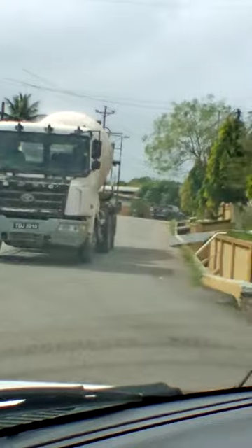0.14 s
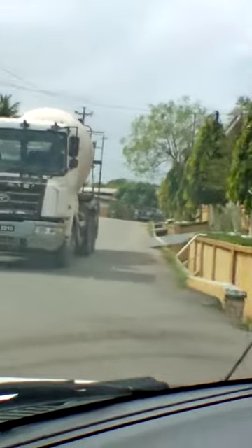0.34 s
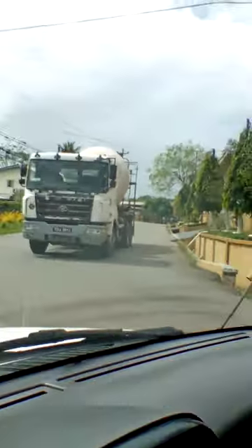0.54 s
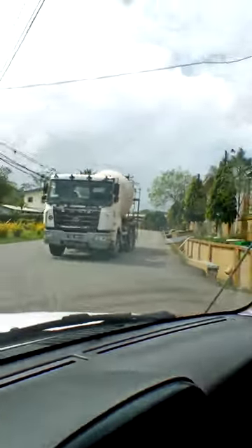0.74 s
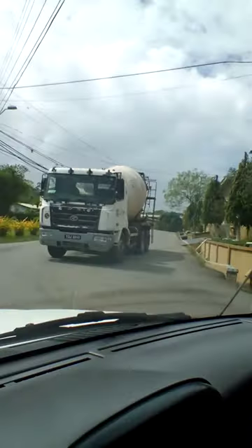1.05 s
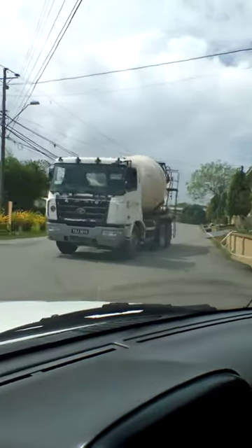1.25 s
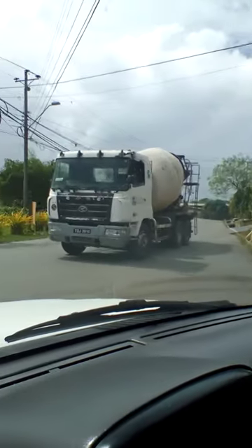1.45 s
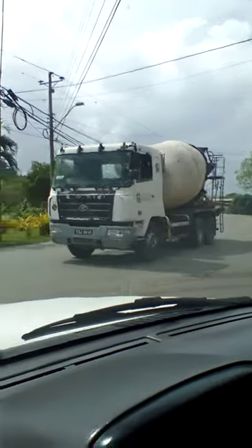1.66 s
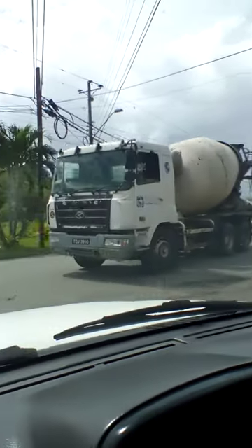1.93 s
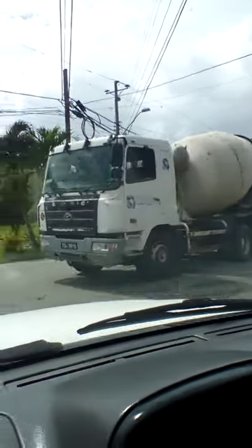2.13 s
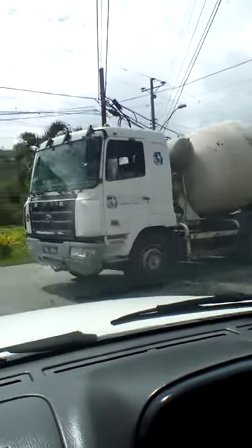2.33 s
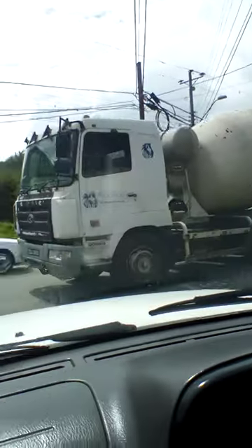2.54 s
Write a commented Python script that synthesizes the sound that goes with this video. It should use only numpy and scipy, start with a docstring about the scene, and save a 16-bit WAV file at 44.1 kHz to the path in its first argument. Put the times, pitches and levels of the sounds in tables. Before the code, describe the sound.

A diesel cement mixer truck approaches and passes close by, droning and clattering, heard through glass from the front seat of a moving car. The car's engine booms briefly, then eases, while road rumble continues and the turn signal ticks faintly.

```python
"""Road rumble fades in first, heard from the front seat of a moving car. The engine's firing pulses boom
in the cabin, then sink as the throttle eases. An oncoming diesel cement mixer passes close by, behind
glass: its exhaust drones, its uneven cylinders clatter and its tyres howl as it draws level.
Near the microphone the trim rustles and rattles, and the contact of the turn-signal relay
ticks shut and tocks open in the dashboard."""
import sys
import numpy as np
from scipy import signal
from scipy.fft import rfft, irfft
from scipy.io import wavfile
from scipy.ndimage import uniform_filter1d

SR = 44100
rng = np.random.default_rng(int(sys.argv[2]) if len(sys.argv) > 2 else 0)


def log_audio(samples):
    """Write samples as a 16-bit WAV file to the path given in sys.argv[1]."""
    # one column per channel
    frames = np.atleast_2d(samples).T
    # limit to full scale, then quantise
    limited = np.clip(frames, -1, 1)
    pcm = np.round(limited * 32767).astype(np.int16)
    wavfile.write(sys.argv[1], SR, pcm)


N = 118629

# road rumble in the cabin (frequency [Hz], relative level [dB])
RUMBLE_SPECTRUM = [(20, -26.5), (32, -16), (52, -15.5), (62, -2.5), (74, 6.5), (108, 7.5), (125, 1),
                   (145, 4.5), (168, -6), (220, -35.5), (1800, -100)]
# road rumble (time [s], level [dB])
RUMBLE_LEVEL = [(0, -29.5), (.4, -33.5), (.8, -32.5), (.95, -33), (1.17, -28), (1.6, -35), (1.69, -34),
                (1.82, -30.5), (1.96, -36.5), (2.02, -30.5), (2.12, -32.5), (2.36, -29), (2.49, -33),
                (2.55, -31), (2.69, -31)]
# tyre and panel drone (frequency [Hz], relative level [dB])
DRONE_SPECTRUM = [(100, -70.5), (160, -23.5), (185, -7.5), (215, 0.5), (250, 0), (295, -1.5), (345, -3.5),
                  (385, -4.5), (420, -13.5), (520, -17.5), (700, -33), (3000, -100)]
# tyre and panel drone (time [s], level [dB])
DRONE_LEVEL = [(0, -43.5), (.4, -30.5), (.62, -36), (.95, -32), (1.15, -35), (1.4, -34), (1.72, -34),
               (1.92, -34.5), (2.35, -35), (2.69, -38)]
# tyre roar through the glass (frequency [Hz], relative level [dB])
ROAR_SPECTRUM = [(250, -13), (450, 3.5), (620, -1.5), (800, -6), (960, -1), (1100, -6.5), (1300, -12),
                 (2500, -18.5), (5000, -45.5), (9000, -75.5)]
# tyre roar (time [s], level [dB])
ROAR_LEVEL = [(0, -54.5), (.4, -46), (.75, -45.5), (1.1, -46), (1.45, -46), (1.8, -45.5), (2.05, -51.5),
              (2.35, -46.5), (2.69, -45)]
# howl of the truck's tyres (centre [Hz], width [Hz], relative level [dB])
HOWL_MODES = [(463, 90, -1.5), (622, 44, -6.5), (750, 100, -5)]
# tyre howl (time [s], level [dB])
HOWL_LEVEL = [(0, -70), (1.6, -58), (2.05, -46.5), (2.22, -47), (2.35, -52.5), (2.69, -45.5)]

# rustle and buzz of the cabin trim (frequency [Hz], relative level [dB])
TRIM_SPECTRUM = [(1000, -7.5), (2500, 8), (3400, 3), (4000, 2.5), (4600, 0), (5600, -0.5), (6700, -8.5),
                 (7400, -17.5), (8200, -25.5), (11000, -23.5), (13000, -46.5)]
# trim rustle (time [s], level [dB])
TRIM_LEVEL = [(0, -72.5), (.35, -64.5), (.7, -66.5), (.85, -65.5), (.98, -56), (1.2, -62.5), (1.4, -59),
              (1.58, -62.5), (1.74, -61), (1.87, -67), (1.97, -61), (2.07, -58), (2.25, -58.5),
              (2.4, -61.5), (2.69, -59.5)]
# first row: a short bright burst as the sound fades in; other rows: short rattles of the trim
# (time [s], level [dB], decay [s], centre [Hz], width [Hz])
BURSTS = [(0.217, -43.5, 0.0064, 2410, 4000), (.585, -47.5, 0.011, 3860, 3000),
          (1.274, -53.5, 0.025, 5770, 1620), (1.293, -51.5, 0.01, 5400, 1900),
          (1.356, -52, .01, 4900, 2530), (1.577, -60, 0.0038, 6735, 1790), (2.225, -55, 0.016, 4484, 398.3)]

# relay closing (time [s], level [dB])
TICKS = [(.4145, -50.5), (1.1215, -50.5), (1.8265, -47), (2.533, -48.5)]
# relay opening (time [s], level [dB])
TOCKS = [(.7545, -46), (1.464, -45.5), (2.170, -45)]
# relay and dashboard resonances on closing (centre [Hz], width [Hz], relative level [dB])
TICK_MODES = [(2950, 260, 1.5), (3400, 240, 4.5), (3790, 130, 1.5), (4450, 370, 1), (4980, 360, -4.5),
              (5440, 260, -6.5), (7470, 170, -12.5), (8130, 180, -22), (10870, 620, -25.5)]
# the same on opening (centre [Hz], width [Hz], relative level [dB])
TOCK_MODES = [(1380, 700, 3), (2600, 200, 4.5), (3130, 380, 1.5), (3780, 170, -3), (4480, 210, 1.5),
              (5500, 240, -5), (5740, 200, -9), (6600, 280, -7), (7260, 170, -6), (10850, 370, -24)]
# snap of the contact (frequency [Hz], relative level [dB])
SNAP_SPECTRUM = [(1200, 0), (6500, -3), (8800, -16), (15000, -33)]

# car engine speed (time [s], firing rate [Hz])
CAR_FIRING_RATE = [(0, 44.07), (.3, 44.56), (.5, 46.3), (.68, 46.02), (.8, 42.8), (.95, 37.07),
                   (1.15, 34.99), (1.9, 34), (2.3, 35.3), (2.69, 36.3)]
# car engine load (time [s], gain [dB])
CAR_LOAD = [(0, -43), (.27, -38.5), (.38, -22.5), (.48, -28), (.55, -22), (.65, -22), (.72, -27),
            (.78, -24.5), (.92, -37.5), (1.9, -36), (2.35, -33.5), (2.69, -32)]
# car engine harmonics, from the firing rate up (level [dB])
CAR_HARMONICS = [-12, -4, -14, -20, -16, -23, -21.5]

# truck exhaust harmonics, from the firing rate up (level [dB])
EXHAUST_HARMONICS = [-38, -46, -49.5]
# exhaust drone (time [s], gain [dB])
EXHAUST_GAIN = [(0, -5.5), (.65, 2), (.85, 2.5), (1.15, 0), (1.4, 6), (1.6, 5.5), (1.78, -3.5), (2.2, -1.5),
                (2.38, -0.5), (2.69, -7)]
# knock of each truck cylinder (relative level [dB])
CYLINDER_KNOCKS = [-6.5, -11, -7.5, -7, -6.5, -4]
# diesel clatter through the glass (frequency [Hz], relative level [dB])
CLATTER_SPECTRUM = [(400, 4), (650, 7.5), (850, -8), (1150, -0.5), (1450, 2.5), (1900, 0.5), (2450, -11),
                    (3000, -11), (4000, -12.5), (5000, -13.5), (6500, -22), (8000, -45), (12000, -74.5)]
# diesel clatter (time [s], level [dB])
CLATTER_LEVEL = [(0, -61), (.42, -50.5), (.66, -54.5), (.95, -52), (1.3, -52), (1.58, -59.5), (1.68, -51),
                 (1.95, -48), (2.07, -50), (2.2, -49), (2.36, -53), (2.47, -49.5), (2.69, -51.5)]
# narrow rings of the cabin fittings (centre [Hz], width [Hz], relative level [dB])
FITTING_MODES = [(1355, 36, 6.5), (1472, 43, -4), (2477, 310, -5.5), (4530, 100, -6.5), (5344, 37, -15.5),
                 (6700, 56, -22), (7240, 110, -25)]

# faint high hiss, brightest around 15 kHz (frequency [Hz], relative level [dB])
HISS_SPECTRUM = [(3000, 0), (11000, 0), (13800, -1), (15000, 10), (16000, 10)]
# opening fade (time [s], gain [dB])
FADE_IN = [(0, -67.5), (.075, -70), (.092, -16), (.115, -9.5), (.18, -7), (.22, -3.5), (.33, -1.5)]


def undb(db):
    """Decibels to gain."""
    return 10 ** (np.asarray(db) / 20)


def times():
    """Time of each sample."""
    return np.arange(N) / SR


def frequencies():
    """Frequency of each spectrum bin."""
    return np.arange(N // 2 + 1) * SR / N


def curve(rows):
    """Rows of (time [s], value) joined by straight lines."""
    return np.interp(times(), *np.array(rows, float).T)


def unit(x):
    """Scale to rms 1."""
    return x / np.sqrt(np.mean(x ** 2))


def noise():
    """White noise."""
    return rng.standard_normal(N)


def wander(rate_hz):
    """Smooth random drift with a spread of 1."""
    return unit(irfft(rfft(noise()) / (1 + (frequencies() / rate_hz) ** 4), N))


def colour(x, spectrum):
    """Filter by (frequency [Hz], level [dB]) points, rolling off below the first; rms 1."""
    hz, db = np.array(spectrum, float).T
    bins = frequencies() + 1e-3
    gain = undb(np.interp(np.log(bins), np.log(hz), db))
    low_cut = np.minimum(bins / hz[0], 1) ** 2
    return unit(irfft(rfft(x) * gain * low_cut, N))


def resonate(x, modes):
    """Pass through (centre [Hz], width [Hz], level [dB]) resonances; rms 1."""
    bins = frequencies()
    gain = sum(undb(db) / (1 + ((bins - hz) / width * 2) ** 2) for hz, width, db in modes)
    return unit(irfft(rfft(x) * gain, N))


def steady(x, span_s=.12):
    """Even out slow swells; rms 1."""
    return x / np.sqrt(uniform_filter1d(x ** 2, int(span_s * SR)))


def patchy(x, depth_db, rate_hz=15):
    """Let each narrow band swell and fade at random; rms 1."""
    frames = dict(fs=SR, nperseg=1024, noverlap=768)
    _, when, bands = signal.stft(x, **frames)
    pole = np.exp(-2 * np.pi * rate_hz * when[1])
    sway = signal.filtfilt([1 - pole], [1, -pole], rng.standard_normal(bands.shape), padtype="even")
    sway = unit(uniform_filter1d(sway, 4, axis=0))  # neighbouring bands move together
    _, swayed = signal.istft(bands * undb(depth_db * sway), **frames)
    return unit(swayed[:N])


def firing_pulses(firings, harmonics, flutter_db=.5):
    """A rounded pulse at each firing, built from harmonics that flutter in level."""
    return sum(np.sqrt(2) * undb(db + flutter_db * wander(34)) * np.cos(2 * np.pi * order * firings)
               for order, db in enumerate(harmonics, 1))


def road(bump_db=.81, cavity_hz=252.2, cavity_db=-44):
    """All around the microphone, the road shakes the cabin and its panels; the air in the tyres rings."""
    rumble = steady(colour(noise(), RUMBLE_SPECTRUM)) * undb(curve(RUMBLE_LEVEL))
    drone = steady(colour(noise(), DRONE_SPECTRUM)) * undb(curve(DRONE_LEVEL))
    bumps = undb(bump_db * wander(6.7))
    cavity_ring = undb(cavity_db) * resonate(noise(), [(cavity_hz, 10, 0)])
    return (rumble + drone) * bumps + cavity_ring


def tyres():
    """Outside the glass, treads roar on the asphalt; a howl grows as the truck draws level."""
    roar = patchy(colour(noise(), ROAR_SPECTRUM), depth_db=2) * undb(curve(ROAR_LEVEL))
    howl = resonate(noise(), HOWL_MODES) * undb(curve(HOWL_LEVEL))
    return roar + howl


def trim(flicker_db=2.5, attack_s=.0035):
    """Near the microphone, the cabin trim rustles and rattles; a bright burst sounds in the fade-in."""
    rustle = undb(curve(TRIM_LEVEL) + flicker_db * wander(35)) * colour(noise(), TRIM_SPECTRUM)
    sound = patchy(rustle, depth_db=5.2) * np.std(rustle)
    for start, db, decay_s, hz, width in BURSTS:
        age = np.maximum(times() - start, 0)
        envelope = undb(db) * np.minimum(age / attack_s, 1) * np.exp(-age / decay_s)
        sound += envelope * resonate(colour(noise(), TRIM_SPECTRUM), [(hz, width, 0)])
    return sound


def relay(events, modes, attack_s, ring_hz, ring_db):
    """At arm's length, a contact snaps and chatters, rings its case and the dashboard, and dies away."""
    hold_s, decay_s = .012, .0089
    tail_db, tail_s = -26.5, .053  # lingering in the cabin
    snap_db, snap_delay_s, snap_s = -1, .005, .0011  # the contact lands
    envelope, snap = 0, 0
    for start, db in events:
        age = np.maximum(times() - start, 0)
        fall = np.exp(-np.maximum(age - hold_s, 0) / decay_s)
        tail = undb(tail_db) * np.exp(-age / tail_s)
        envelope += undb(db) * np.minimum(age / attack_s, 1) * (fall + tail)
        snap += undb(db + snap_db) * np.exp(-np.abs(age - snap_delay_s) / snap_s) * (age > 0)
    chatter = resonate(noise(), modes)
    case_ring = np.sqrt(2) * undb(ring_db) * np.sin(2 * np.pi * ring_hz * times())
    return envelope * unit(chatter + case_ring) + snap * colour(noise(), SNAP_SPECTRUM)


def car_engine(drift=.0068):
    """Just ahead of the seat, firing pulses boom under throttle, then sink towards idle."""
    firings = np.cumsum(curve(CAR_FIRING_RATE) * (1 + drift * wander(5.2))) / SR
    return firing_pulses(firings, CAR_HARMONICS) * undb(curve(CAR_LOAD))


def truck_engine(firing_hz=104.8, drift=.008, scatter_db=4, knock_floor=.82, fittings_db=-8.5):
    """Close outside, six uneven cylinders drive an exhaust drone; their knocks ring the car's fittings."""
    firings = np.cumsum(firing_hz * (1 + drift * wander(3.65))) / SR
    firing_index = firings.astype(int)
    cylinder_db = np.array(CYLINDER_KNOCKS)[firing_index % len(CYLINDER_KNOCKS)]
    strength = undb(cylinder_db + scatter_db * noise()[firing_index])
    knocks = knock_floor + strength * np.exp(-(firings % 1))  # each decays until the next firing
    through_glass = colour(noise() * knocks, CLATTER_SPECTRUM)
    fittings = undb(fittings_db) * resonate(noise() * knocks, FITTING_MODES)
    clatter = patchy(through_glass + fittings, depth_db=4) * undb(curve(CLATTER_LEVEL))
    exhaust = firing_pulses(firings, EXHAUST_HARMONICS) * undb(curve(EXHAUST_GAIN))
    return clatter + exhaust


def scene():
    """Everything as heard from the front seat, in mono."""
    ticks = relay(TICKS, TICK_MODES, attack_s=.0012, ring_hz=3388, ring_db=-4)
    tocks = relay(TOCKS, TOCK_MODES, attack_s=.0023, ring_hz=2700, ring_db=-6)
    return (road() + tyres() + trim() + ticks + tocks + car_engine() + truck_engine())[None]


def record(dry):
    """A faint high hiss, brightest around 15 kHz, joins in; the sound fades in and the top is cut."""
    hiss_db, cutoff_hz = -73.5, 15750
    hiss = undb(hiss_db) * colour(noise(), HISS_SPECTRUM)
    faded = (dry + hiss) * undb(curve(FADE_IN))
    low_pass = signal.ellip(10, .2, 80, cutoff_hz, fs=SR, output="sos")
    return signal.sosfilt(low_pass, faded)


dry = scene()
out = record(dry)
log_audio(out)
```